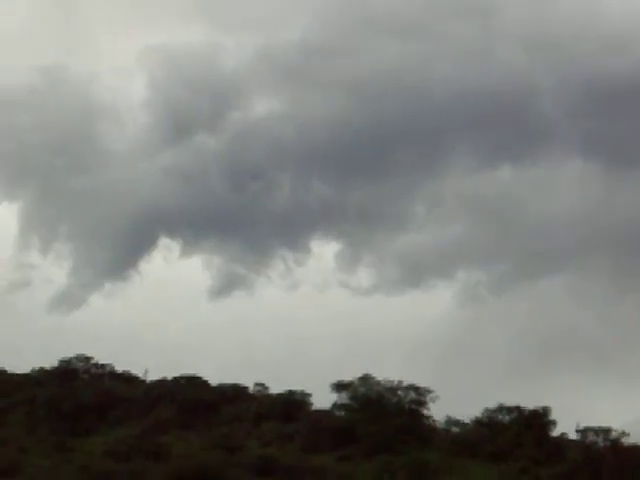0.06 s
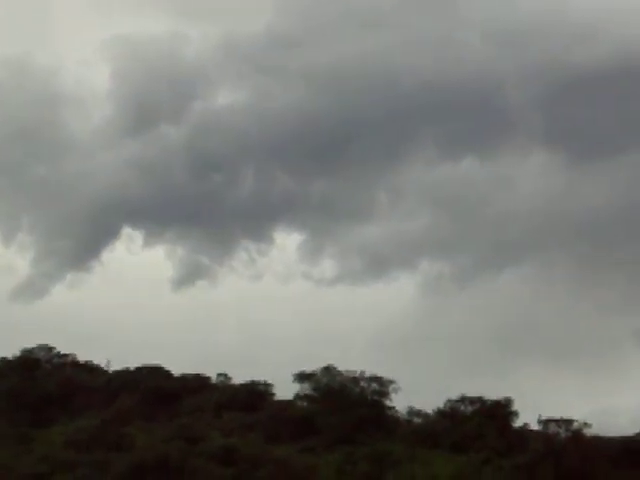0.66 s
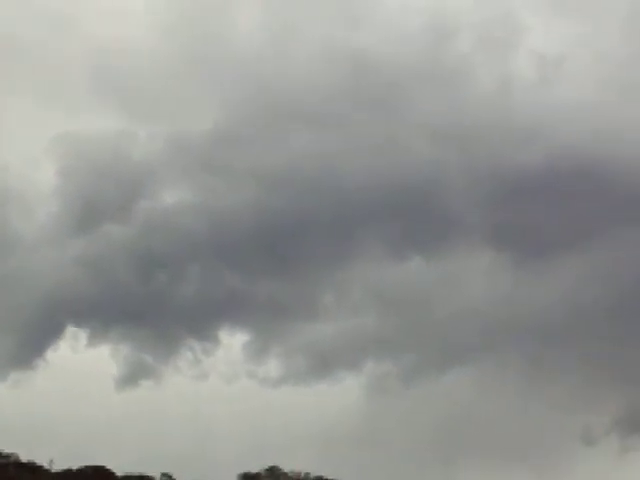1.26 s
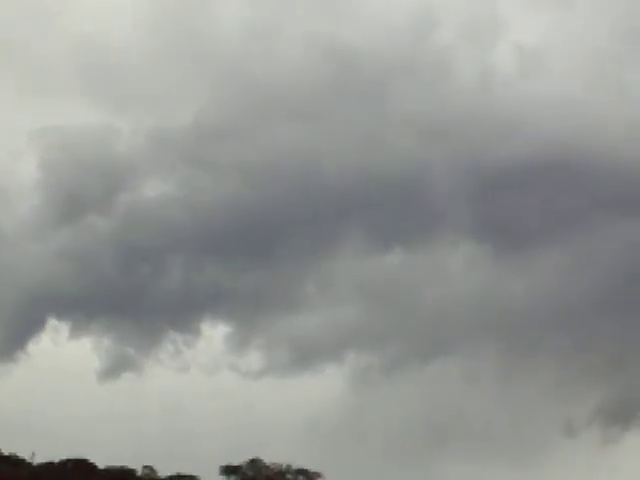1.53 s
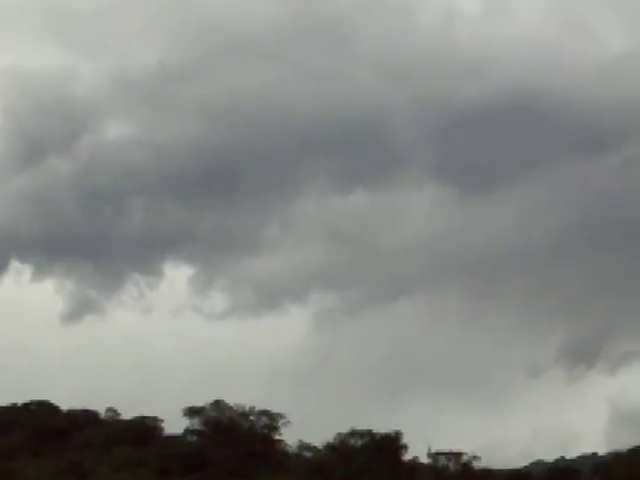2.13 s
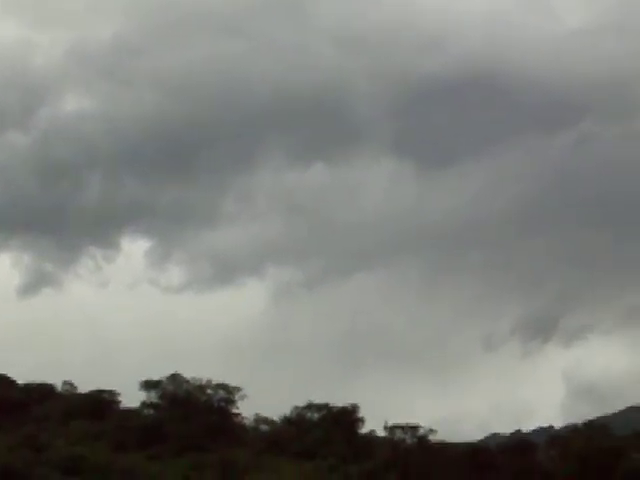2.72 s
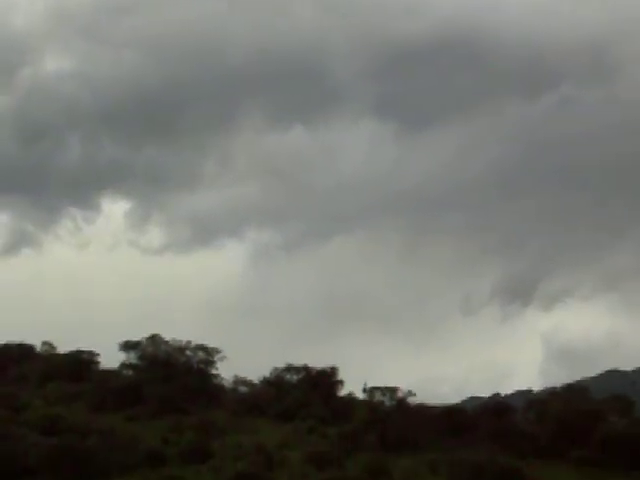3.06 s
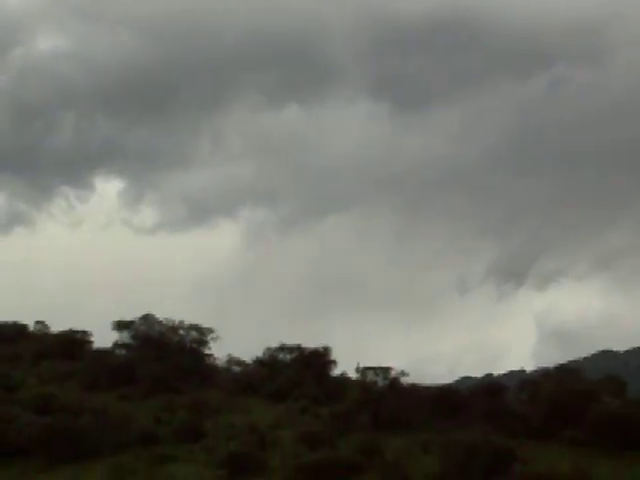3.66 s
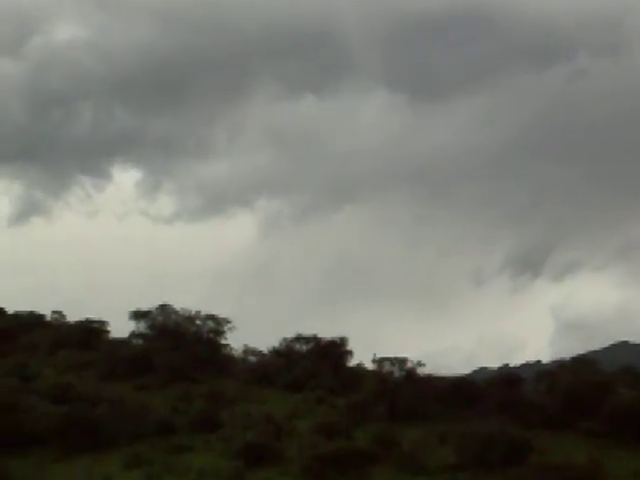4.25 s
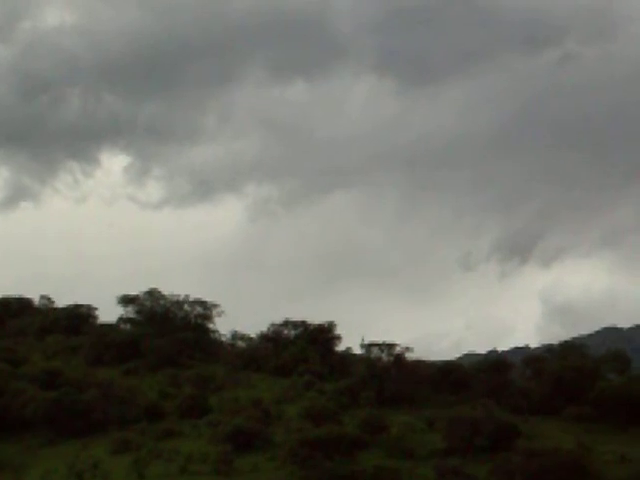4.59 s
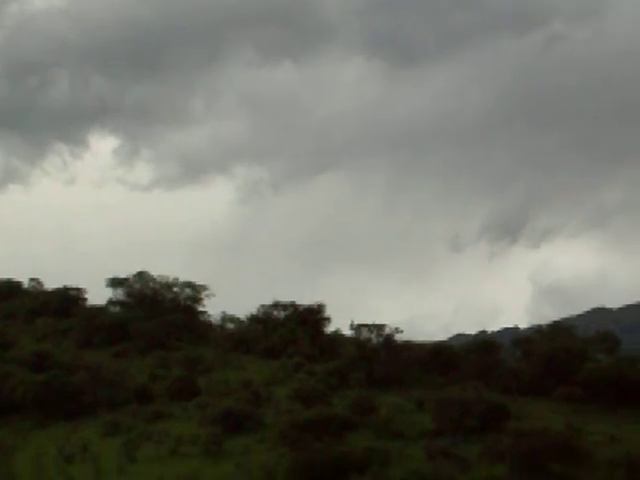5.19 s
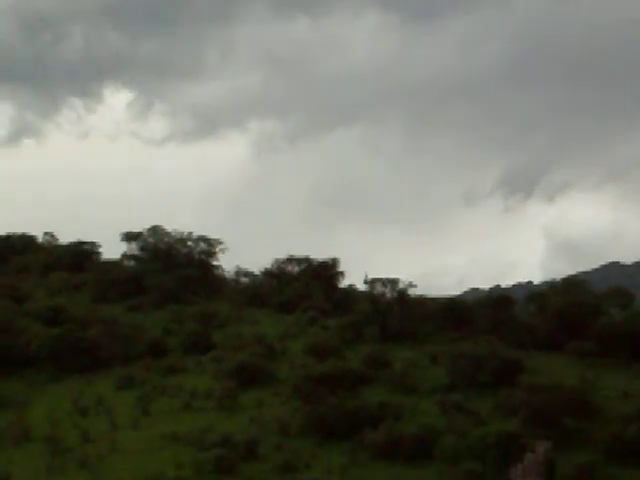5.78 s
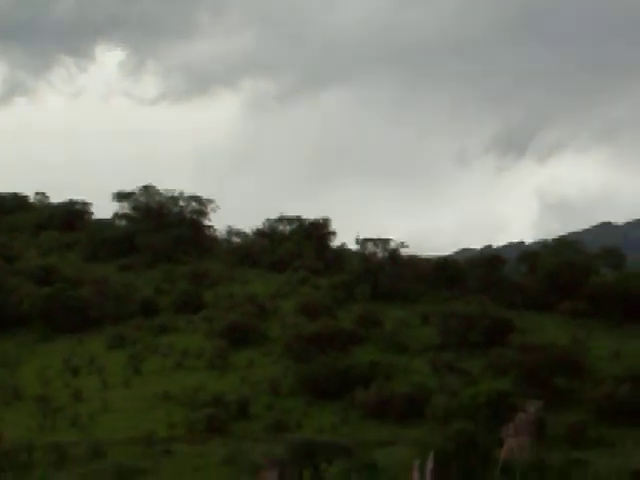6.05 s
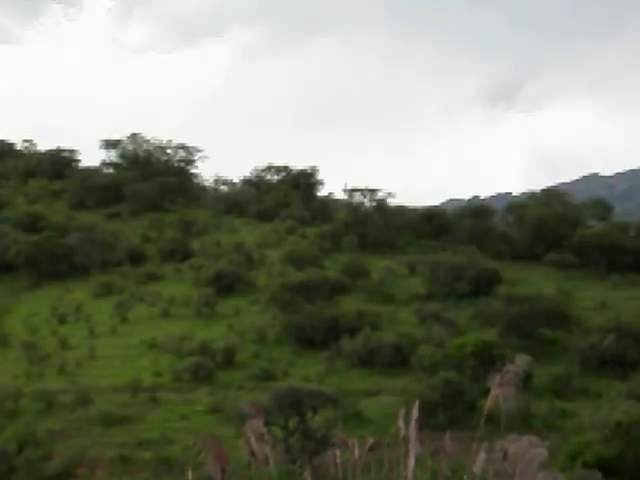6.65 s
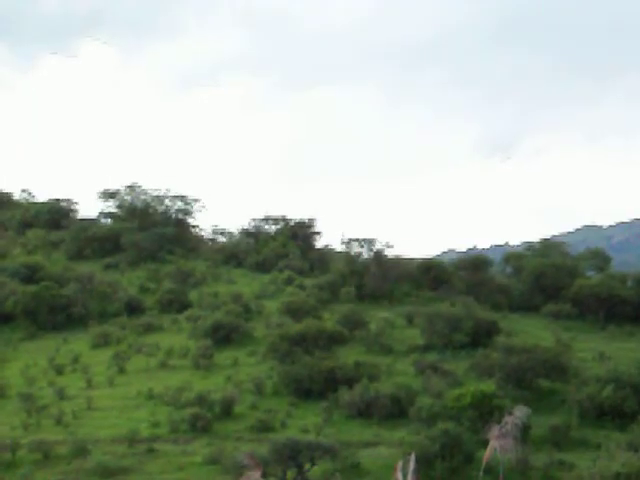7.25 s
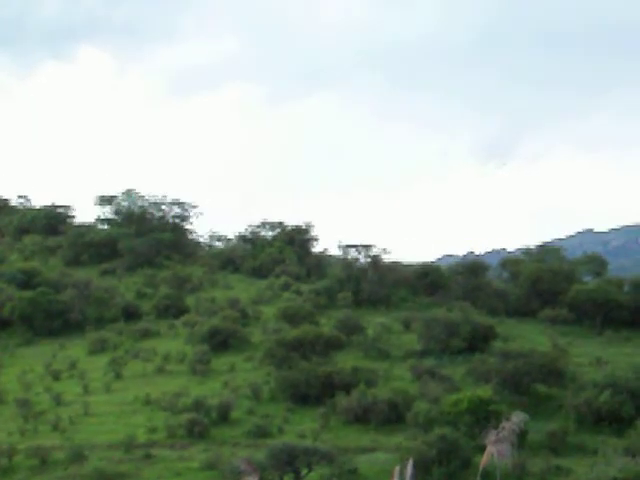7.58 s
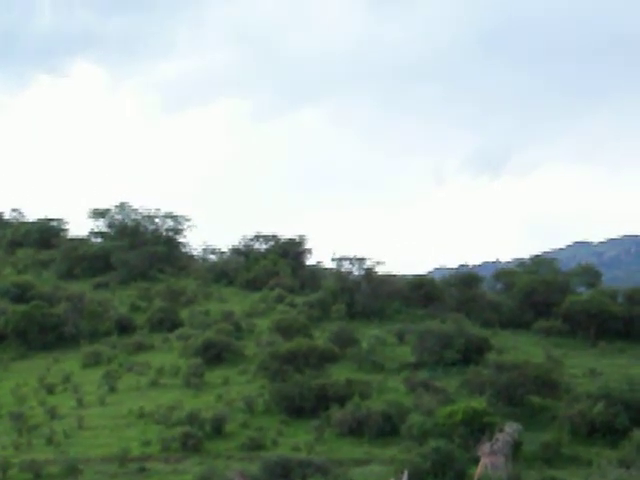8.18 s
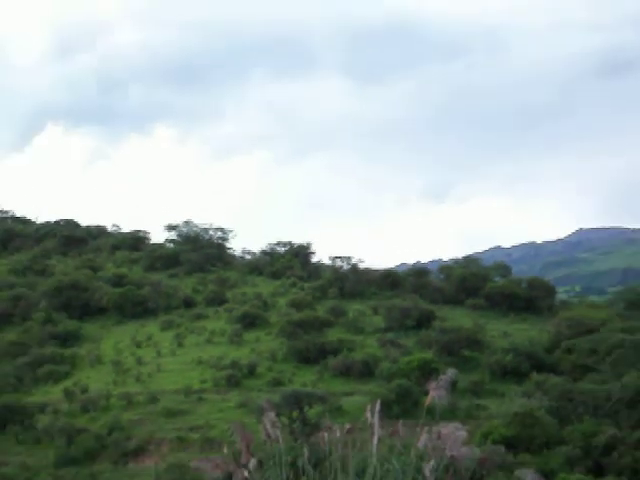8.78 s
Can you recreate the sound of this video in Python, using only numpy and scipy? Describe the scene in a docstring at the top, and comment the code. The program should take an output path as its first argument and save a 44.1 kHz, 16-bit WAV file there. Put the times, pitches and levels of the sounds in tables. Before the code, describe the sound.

A motor vehicle is heard approaching along a country road from the start, a low, steady engine drone with a soft tyre roar. A breeze rumbles on the hand-held microphone, with small gusts near 0.8 seconds and between 2 and 2.7. Faint, high bird whistles come from the scrub, followed by a quick trill of falling chips from 2.8 to 3.4 seconds. The vehicle grows louder and passes between about 5 and 6 seconds, its tyres hissing briefly and its engine note sinking. From 5.5 to 6.6 seconds the hardest exhaust beats overload the sound, making a quick, uneven rattle of about a dozen sharp clicks. The engine then eases off but stays audible to the end, near 9 seconds. One sharp plastic handling click comes at 8 seconds, followed by a few more bird whistles and a softer tap.

```python
"""A motor vehicle passes on a country road, 10 m from the microphone, its engine note sinking as it goes.
Its tyres roar and hiss, birds whistle in the scrub, and a breeze buffets the microphone of a small
hand-held camera, whose body clicks in the hand. Just after the pass, the hardest exhaust beats
overflow the camera's narrow-band converter, which makes a quick rattle of clicks."""
import sys
import numpy as np
from scipy import signal
from scipy.fft import rfft, irfft, next_fast_len
from scipy.io import wavfile
from scipy.ndimage import uniform_filter1d

SR = 44100
rng = np.random.default_rng(int(sys.argv[2]) if len(sys.argv) > 2 else 0)


def wav_out(sig):
    """Save sig, one row per channel (or a flat mono array), as 16-bit PCM at SR to the path in sys.argv[1]."""
    wavfile.write(sys.argv[1], SR, np.round(np.clip(np.atleast_2d(sig).T, -1, 1) * 32767).astype(np.int16))


N = 388521
TIME = np.arange(N) / SR
CLOSEST_S, SPEED_M_S, ROAD_DISTANCE_M = 5.78, 17, 10
FULL_SCALE = .68  # the converter overflows above this amplitude

# engine speed at the vehicle: (time [s], firing rate [Hz])
FIRING_RATE = [(0, 92.9), (1.9, 92.65), (4, 91.45), (4.75, 92), (5.05, 91.8), (5.8, 92.6), (7, 92.4),
               (7.2, 91.85), (7.65, 92.6), (7.95, 92.15), (8.81, 92.4)]
# engine note from the roadside: (time [s], base level [dB])
ENGINE_LEVEL = [(0, -36), (1, -35), (2.3, -30.5), (3.25, -28.5), (3.9, -24.5), (4.75, -18), (6.7, -17.5),
                (7.65, -19.5), (8.2, -22.5), (8.81, -24)]
# engine partials: (multiple of firing rate, ahead [dB], abreast [dB], behind [dB], tailpipe lift [dB])
ENGINE_PARTIALS = [(1, -7, 0, -6.5, 0), (2, 1, -.5, 1.5, -1.5), (3, -20, -9, -11, 7),
                   (3.5, -24.5, -22.5, -26, 4.5), (4, -15, -13.5, -11, -1), (5, -17.5, -22, -15, -3.5),
                   (6, -21.5, -23, -28, 1.5), (7, -26.5, -23.5, -26, 1), (8, -24, -28.5, -31.5, 3.5),
                   (10, -24, -21.5, -23, 2)]
# the note sways between two partials: (time [s], half length [s], fundamental [dB], octave [dB])
ENGINE_SWAYS = [(1.22, .15, 3.5, 1), (3.15, .12, 5, -0.5), (3.623, .22, 7.5, 2), (3.973, 0.12, -6, 3.5),
                (5.35, 0.13, 1.5, -1.5), (6.52, .11, 6, -3.5), (7.184, 0.18, 7.5, -7),
                (7.98, 0.12, 1.5, -6.5), (8.401, 0.67, 6, -2)]
# hardest exhaust beats: (time [s], crest width at full scale [ms], gap in the overload chatter [ms])
# a gap gives a lower-pitched click
EXHAUST_CRESTS = [(5.4787, .27, 0), (5.8640, .36, .18), (5.9075, .27, 0), (5.9512, .46, 0),
                  (5.9949, .36, .18), (6.0614, .12, 0), (6.1501, .12, 0), (6.2391, .27, 0),
                  (6.2616, .36, .18), (6.3510, .12, 0), (6.4406, .27, 0), (6.4854, .27, 0),
                  (6.5533, .12, 0)]
# roar of tyres and engine bay from the roadside: (time [s], base level [dB])
ROAR_LEVEL = [(0.0, -44), (1.45, -42.5), (4.6, -27), (5.5, -25.5), (5.61, -27), (7.9, -33)]
# its colour from four sides of the vehicle: (frequency [Hz], relative level [dB])
ROAR_AHEAD = [(20, -11.5), (80, 3.5), (140, 1.5), (300, 1), (450, -2), (620, 0), (780, -2), (940, 2.5),
              (1400, -4.5), (1800, -4.5), (2400, -12.5), (2750, -15), (2950, -23.5), (4000, -30)]
ROAR_ABREAST = [(20, -9.5), (80, 7.5), (140, 0.5), (320, 5.5), (480, -5.5), (720, 0.5), (950, 5.5),
                (1250, -5.5), (1500, -8.5), (1850, -9.5), (2300, -10.5), (2800, -15), (3500, -28.5)]
ROAR_JUST_PAST = [(20, -12.5), (80, -0.5), (140, 6.5), (320, 7.5), (500, 2), (780, 5), (1000, -2.5),
                  (1400, -4), (1900, -15), (2700, -10.5), (3050, -16.5), (3500, -32.5)]
ROAR_BEHIND = [(20, -6), (80, 5), (140, 6.5), (320, 1.5), (500, -1), (700, -3), (950, 1.5), (1250, -3),
               (1480, -2.5), (1900, -6.5), (2450, -12), (3100, -21.5), (4000, -23.5)]
# tread hiss: (frequency [Hz], relative level [dB])
HISS_COLOUR = [(1800, -26.5), (2950, -3), (3300, 2), (3650, 0), (3980, 1.5), (4300, -2.5), (4600, -4),
               (5100, -3), (5450, -3), (5700, -29)]
# its brightest band ahead, abreast and just past: (centre [Hz], relative level [dB])
HISS_BRIGHT_BANDS = [(4580, -6), (4020, -2), (2850, -2)]
# birds in the scrub: (time [s], length [s], start [Hz], middle [Hz], end [Hz], level [dB])
BIRD_WHISTLES = [(.08, .06, 4850, 4680, 4600, -53), (.76, .07, 3750, 3980, 4200, -51),
                 (1.42, .08, 4200, 3980, 3800, -53), (1.65, .21, 3620, 3780, 3730, -51.5),
                 (1.98, .14, 5250, 4680, 4600, -47.5), (2.08, .2, 4600, 3750, 3250, -45),
                 (2.43, .05, 4850, 5200, 5550, -54), (2.47, .19, 5550, 4280, 3250, -45),
                 (8.135, .035, 4950, 5000, 4900, -44.5), (8.14, .22, 3530, 3590, 3500, -47),
                 (8.245, .03, 4950, 4750, 4550, -51), (8.365, .04, 3100, 3130, 3230, -46)]
# taps of the hand on the camera: (time [s], strength [dB])
CAMERA_TAPS = [(.045, -33), (7.9948, -9), (8.6799, -27)]
# modes of the camera body: (frequency [Hz], time to fall 60 dB [s], relative level [dB])
CAMERA_MODES = [(378, .03, -13.5), (807, .04, -3.5), (1190, .03, -1), (1300, 0.017, -0.5),
                (1640, 0.022, -9), (2840, 0.014, -5), (3570, 0.013, -5), (4400, .006, -9),
                (5270, .006, -1.5)]
# breeze on the microphone: (frequency [Hz], relative level [dB])
BREEZE_COLOUR = [(10, -10), (25, -3.5), (52, 2.5), (75, -3), (120, -13.5), (300, -35.5)]
# its gusts: (time [s], half length [s], rise [dB])
BREEZE_GUSTS = [(.78, 0.054, 7), (1.98, 0.083, 12), (2.426, .06, 7), (2.66, 0.07, 8)]
# open countryside all around: (frequency [Hz], relative level [dB])
COUNTRY_COLOUR = [(20, -5), (100, 2.5), (300, -0.5), (500, 0.5), (700, -11), (1500, -22.5), (2400, -6),
                  (3000, -14), (4000, -29.5)]


def engine(angle, behind, tailpipe, waver_db=1.67):
    """Pressure pulses, alternately strong and weak: suction dips in front, exhaust crests at the rear."""
    abreast, leaving = turn(4.61, .11), turn(5.91, .34)
    in_line = swell(6.59, .65)  # in line with the tailpipe, most overtones lift
    sway = {1: sum(db * swell(s, half) for s, half, db, _ in ENGINE_SWAYS),
            2: sum(db * swell(s, half) for s, half, _, db in ENGINE_SWAYS)}
    sway[1] += 2.4 * (1 - abreast) * walk(7)
    front_phase = (1 - behind) * np.pi  # the suction dip lies a quarter period from the exhaust crest
    base_db, note = curve(ENGINE_LEVEL), np.zeros(N)
    for k, ahead_db, abreast_db, behind_db, lift_db in ENGINE_PARTIALS:
        side_db = ahead_db + abreast * (abreast_db - ahead_db) + leaving * (behind_db - abreast_db)
        sway_db = sway[k] if k in sway else waver_db * walk(3.6)
        gain = np.sqrt(2) * undb(base_db + side_db + lift_db * in_line + sway_db)
        note += gain * np.cos(k * angle + front_phase * (1 - k / 2))
    limp = (.053 * behind + .16 * tailpipe) * np.cos(angle / 2)
    return note * (1 + limp + .1 * walk(90))


def firing_count():
    """Firings reaching the microphone, Doppler-shifted; hard beats fall on the stronger, even ones."""
    along_m = SPEED_M_S * (TIME - CLOSEST_S)
    receding_m_s = SPEED_M_S * along_m / np.hypot(along_m, ROAD_DISTANCE_M)
    heard_hz = curve(FIRING_RATE) / (1 + receding_m_s / 343)
    count = np.cumsum(heard_hz * (1 + .00096 * walk(20))) / SR
    beat_times = np.array(EXHAUST_CRESTS)[:, 0]
    lead = np.unwrap(np.interp(beat_times, TIME, count) % 2, period=2)
    return count - np.interp(TIME, beat_times, lead)


def hard_beats(pressure, crest_ms=.27):
    """Ordinary crests round off under full scale; the hardest exhaust beats rise just above it."""
    out = pressure / (1 + np.abs(pressure / FULL_SCALE) ** 8) ** (1 / 8)
    for s, over_ms, chatter_gap_ms in EXHAUST_CRESTS:
        near = np.abs(TIME - s) < .005
        ms = 1000 * (TIME[near] - s)
        crest = np.exp(((over_ms / 2) ** 2 - ms ** 2) / (2 * crest_ms ** 2))
        crest = np.where(np.abs(ms) < chatter_gap_ms / 2, .99, crest)
        out[near] += np.minimum(crest, 1) * (FULL_SCALE * np.maximum(crest, 1) - out[near])
    return out


def road_noise(angle, behind, tailpipe):
    """Tyre and engine-bay roar with tread hiss, coloured by the side in view, pulsed by the exhaust."""
    abreast, past, gone = turn(4.72, .25), turn(5.6, .24), turn(6.7, .22)
    shares = [1 - abreast, abreast * (1 - past), past * (1 - gone), gone]
    colours = [ROAR_AHEAD, ROAR_ABREAST, ROAR_JUST_PAST, ROAR_BEHIND]
    roar = sum(np.sqrt(share) * noise(colour, band_hz=(520, 1600))
               for colour, share in zip(colours, shares))
    roar_db = curve(ROAR_LEVEL) + 1.5 - 1.93 * past + .7 * walk(25)
    roar = road_bounce(roar, past) * undb(roar_db)
    puffs = np.exp(4.5 * (np.cos(angle) - 1)) * (1 + .7 * np.cos(angle / 2))  # one with each firing
    pulsing = 1 + (.15 * behind + 1.1 * tailpipe) * (puffs - .27)
    return (roar + tread_hiss(shares)) * pulsing


def road_bounce(roar, past, ahead_hz=1190, behind_hz=1812, width_hz=330, depth=.68):
    """The bounce off the road partly cancels one band at the microphone; it rises during the pass."""
    hz, times, frames = signal.stft(roar, SR, nperseg=1024)
    centre_hz = np.interp(times, TIME, ahead_hz + past * (behind_hz - ahead_hz))
    offset = (hz[:, None] - centre_hz) / (width_hz / 2)
    return signal.istft(frames * (1 - depth / (1 + offset ** 2)), SR)[1][:N]


def tread_hiss(side_shares, peak_s=5.264, rise_s=.92, fall_s=.45, beam_db=-38, floor_db=-53):
    """The treads beam their hiss sideways; its brightest band drops as the beam sweeps the microphone."""
    off_beam = (TIME - peak_s) / np.where(TIME < peak_s, rise_s, fall_s)
    beam = np.hypot(undb(beam_db) / (1 + off_beam ** 2), undb(floor_db))
    bands = sum(np.sqrt(share) * undb(db) * noise([(.82 * hz, -25), (hz, 0), (1.22 * hz, -25)])
                for (hz, db), share in zip(HISS_BRIGHT_BANDS, side_shares))
    return (noise(HISS_COLOUR) + bands) * beam * undb(.8 * walk(40))


def birds(trill_at_s=2.809, chips=11, chips_per_s=16.9, scatter_t60_s=.56):
    """Whistles and a trill of falling chips off in the scrub, scattered a little by the bushes."""
    calls = np.zeros(N)
    for s, length_s, *pitches_hz, db in BIRD_WHISTLES:
        add(calls, s, whistle(length_s, pitches_hz, db))
    for k in range(chips):
        add(calls, trill_at_s + k / chips_per_s, whistle(.022, pitches_hz=(4550, 3300), db=-47.5))
    t = TIME[:SR // 2]
    scatter = rng.standard_normal(len(t)) * undb(-60 * t / scatter_t60_s)
    return calls + undb(-10) * signal.fftconvolve(calls, scatter / np.linalg.norm(scatter))[:N]


def whistle(length_s, pitches_hz, db, waver=.007, flutter_db=1.8):
    """A bird's near-pure note gliding through its pitches, a little unsteady in pitch and strength."""
    u = np.linspace(0, 1, int(length_s * SR))
    bend, flutter = (np.interp(u, np.linspace(0, 1, 20), row) for row in rng.standard_normal((2, 20)))
    glide = np.polyfit(np.linspace(0, 1, len(pitches_hz)), pitches_hz, len(pitches_hz) - 1)
    hz = np.polyval(glide, u) * (1 + waver * bend)
    envelope = np.sqrt(2) * undb(db + flutter_db * flutter) * np.sin(np.pi * u)
    return envelope * np.sin(2 * np.pi * np.cumsum(hz) / SR)


def camera_clicks(contact_s=.0026):
    """Handling noise right at the microphone: each tap scrapes briefly and rings the plastic body."""
    out, t = np.zeros(N), TIME[:SR // 10]
    ring = sum(undb(db - 60 * t / t60) * np.sin(2 * np.pi * hz * t) for hz, t60, db in CAMERA_MODES)
    for s, db in CAMERA_TAPS:
        scrape = signal.resample_poly(rng.standard_normal(len(t) // 4), 4, 1)[:int(contact_s * SR)]
        scrape /= np.sqrt(np.mean(scrape ** 2))
        add(out, s, undb(db - 7) * scrape)
        add(out, s, undb(db) * ring)
    return out


def breeze(calm_db=-38.5, swell_db=7.5):
    """Air buffets the microphone: a low rumble with a few gusts and a broad swell around the pass."""
    gusts_db = sum(db * swell(s, half) for s, half, db in BREEZE_GUSTS)
    return noise(BREEZE_COLOUR) * undb(calm_db + swell_db * swell(5.7, 2.9) + gusts_db)


def countryside(level_db=-43.5):
    """The faint, steady ambience of open country."""
    return undb(level_db) * noise(COUNTRY_COLOUR)


def noise(colour, band_hz=(0, SR)):
    """Noise of a given colour, rolled off above its last point, with rms 1 inside the band."""
    size = next_fast_len(N)
    f = np.arange(size // 2 + 1) * SR / size
    hz, db = np.transpose(colour)
    gain = undb(np.interp(np.log(f + 1), np.log(hz), db)) / np.maximum(f / hz[-1], 1) ** 4
    band_power = np.sum(gain[(f > band_hz[0]) & (f < band_hz[1])] ** 2) / len(f)
    return irfft(rfft(rng.standard_normal(size)) * gain, size)[:N] / np.sqrt(band_power)


def walk(rate_hz):
    """Random levels held 1 / rate_hz seconds and smoothed twice; spread near 1."""
    hold = int(SR / rate_hz)
    steps = np.repeat(rng.standard_normal(N // hold + 1), hold)
    return 1.3 * uniform_filter1d(uniform_filter1d(steps, hold), hold)[:N]


def turn(at_s, over_s):
    """A smooth change from 0 to 1 as the vehicle shows the microphone another side."""
    return .5 + .5 * np.tanh((TIME - at_s) / over_s)


def swell(at_s, half_s):
    """A smooth rise to 1 and back."""
    return np.exp(-((TIME - at_s) / half_s) ** 2)


def curve(table):
    """A table's points, joined by straight lines in time."""
    return np.interp(TIME, *np.transpose(table))


def undb(db):
    """Decibels to gain."""
    return np.exp(np.asarray(db) * (np.log(10) / 20))


def add(out, at_s, sound):
    """Mix a sound in at a given time."""
    i = max(int(at_s * SR), 0)
    out[i:i + len(sound)] += sound[:N - i]


def scene():
    """From the roadside, in mono: the vehicle goes by among birds and breeze."""
    angle = 2 * np.pi * firing_count()
    behind = turn(5.45, .34)
    tailpipe = swell(6.4, .52)  # the tailpipe points at the microphone
    vehicle = engine(angle, behind, tailpipe) + road_noise(angle, behind, tailpipe)
    outdoors = birds() + breeze() + countryside()
    return (hard_beats(vehicle + outdoors) + camera_clicks())[None]


def record(dry, bandwidth_hz=5450, output_rail=.71, top_hz=16800):
    """The camera's quarter-rate converter chatters between its rails on overload; its output clips."""
    x = dry[0, ::4]
    index = np.arange(len(x))
    last_in_range = np.maximum.accumulate(np.where(np.abs(x) > FULL_SCALE, 0, index))
    x = np.where((index - last_in_range) % 2 == 1, -np.sign(x) * FULL_SCALE, x)
    smoothing = signal.firwin(97, bandwidth_hz, window=("kaiser", 8), fs=SR)
    x = signal.resample_poly(x, 4, 1, window=smoothing)[:N]
    x = np.clip(x, -output_rail, output_rail)
    x *= np.minimum((TIME[-1] - TIME) / .004, 1)  # 4 ms fade-out
    lowpass = signal.ellip(8, .2, 70, top_hz, fs=SR, output="sos")
    return signal.sosfilt(lowpass, x)[None]


dry = scene()
out = record(dry)
wav_out(out)
```